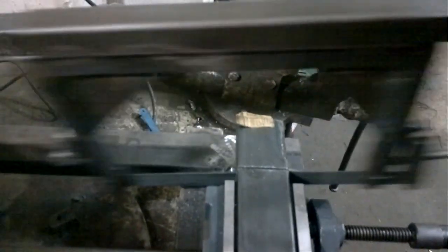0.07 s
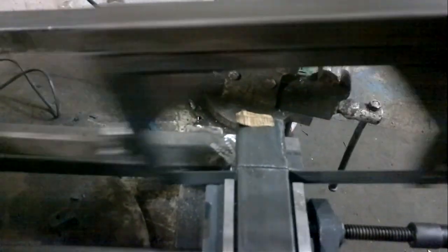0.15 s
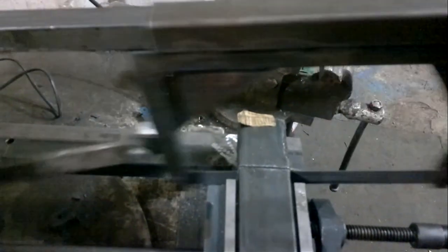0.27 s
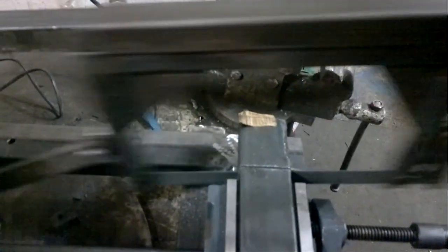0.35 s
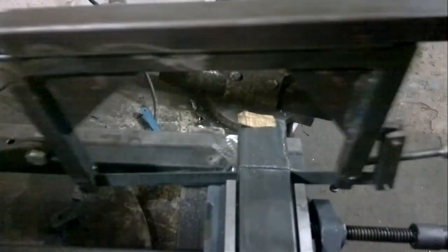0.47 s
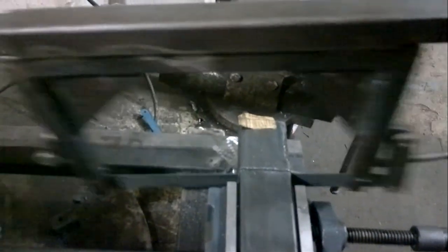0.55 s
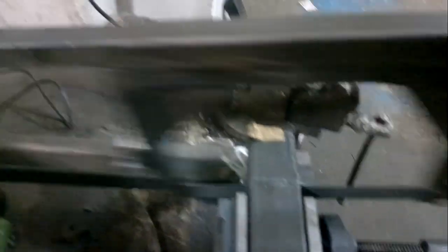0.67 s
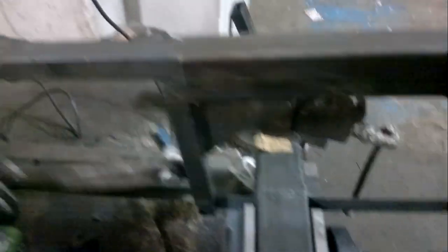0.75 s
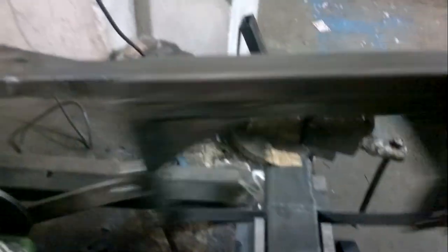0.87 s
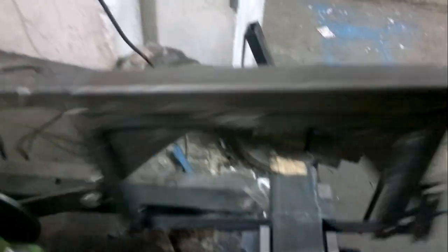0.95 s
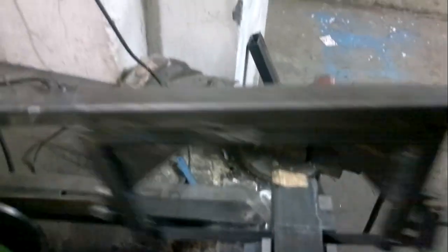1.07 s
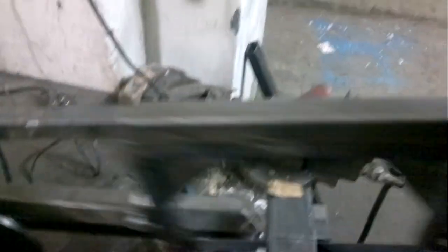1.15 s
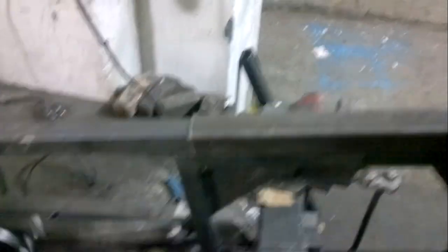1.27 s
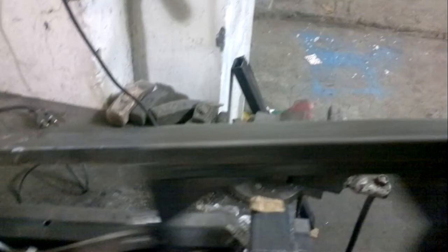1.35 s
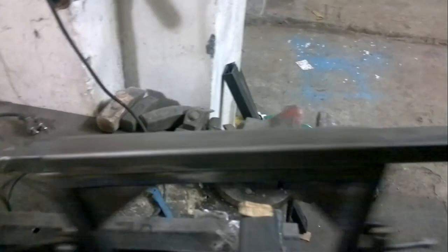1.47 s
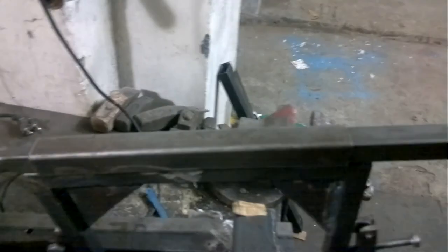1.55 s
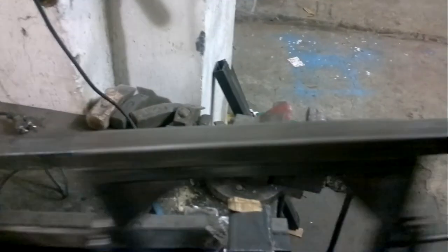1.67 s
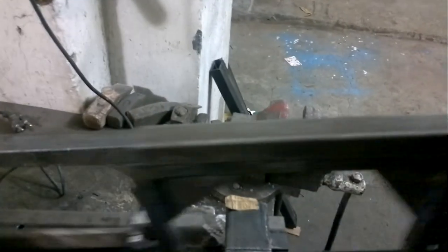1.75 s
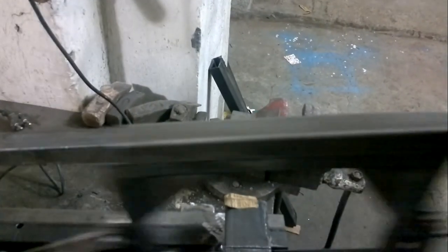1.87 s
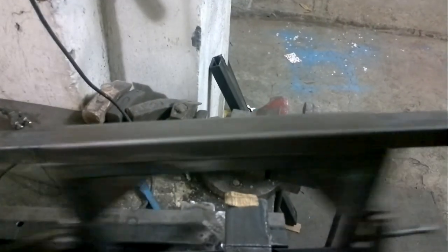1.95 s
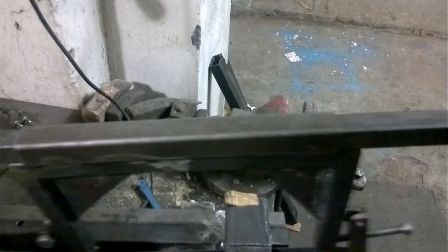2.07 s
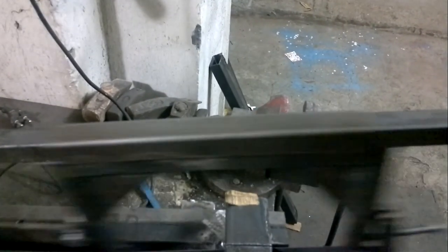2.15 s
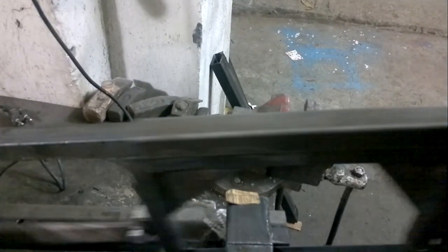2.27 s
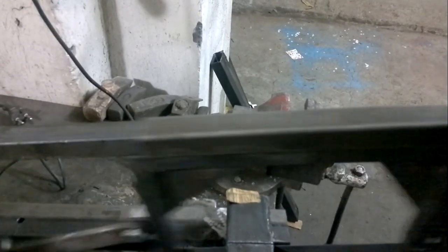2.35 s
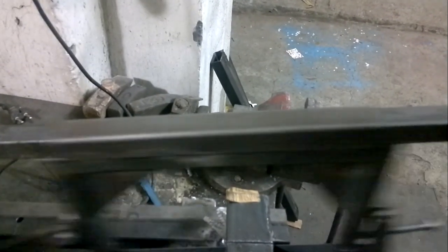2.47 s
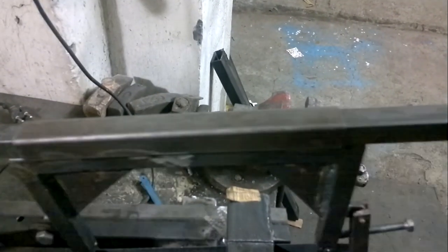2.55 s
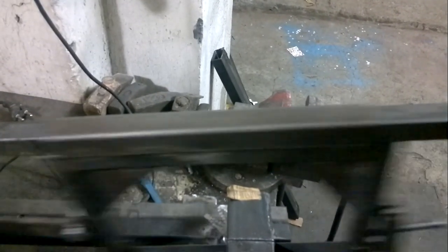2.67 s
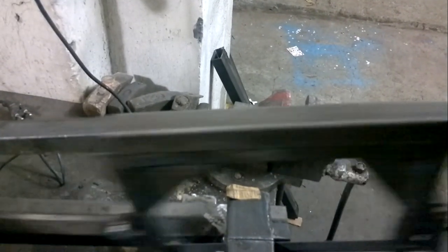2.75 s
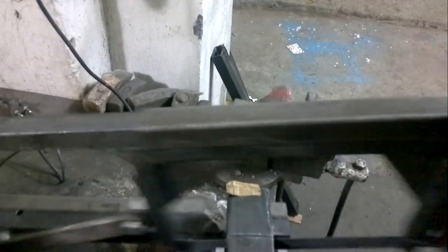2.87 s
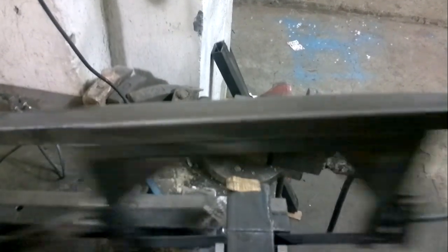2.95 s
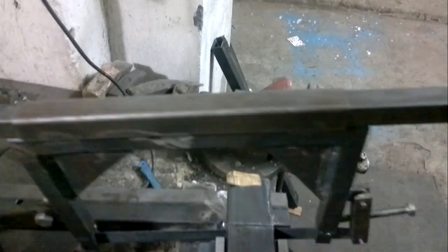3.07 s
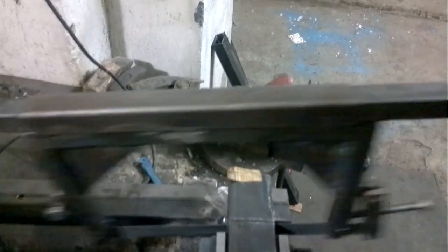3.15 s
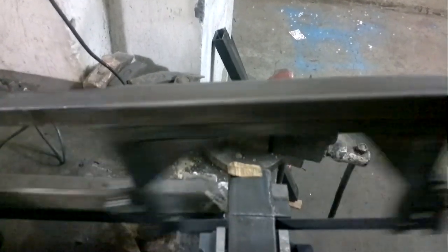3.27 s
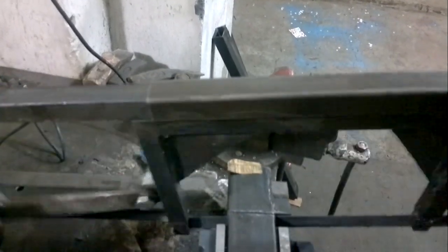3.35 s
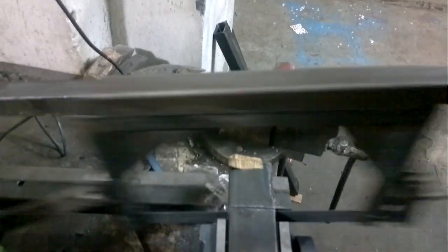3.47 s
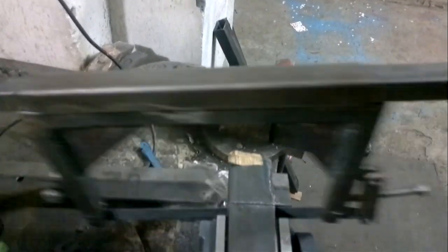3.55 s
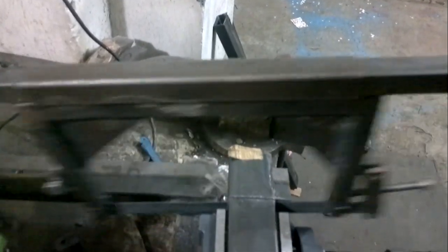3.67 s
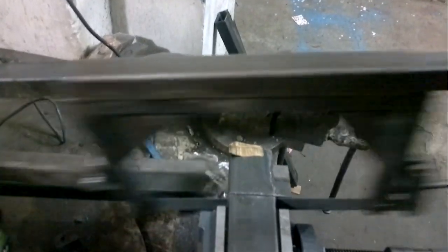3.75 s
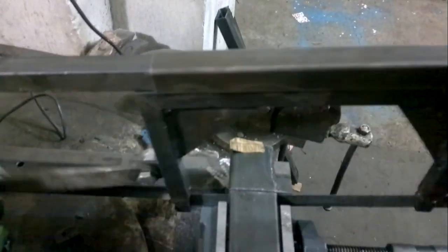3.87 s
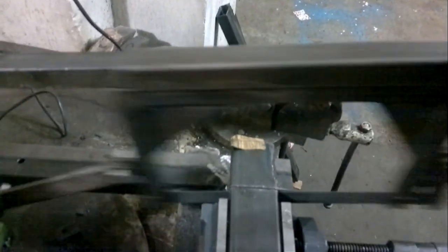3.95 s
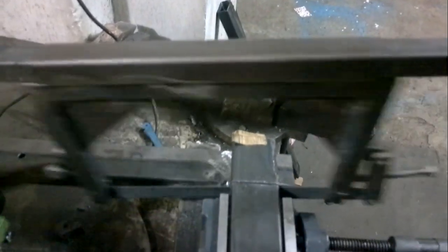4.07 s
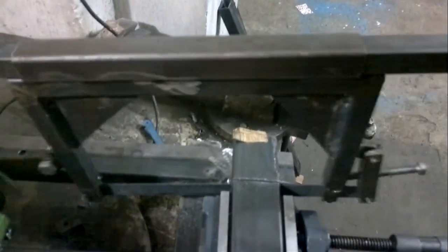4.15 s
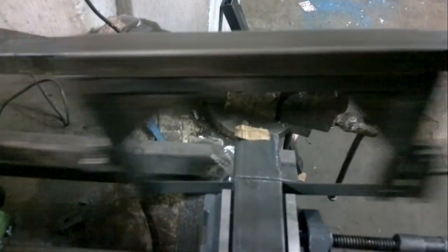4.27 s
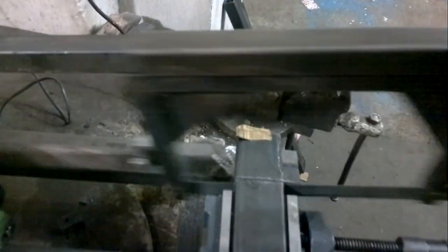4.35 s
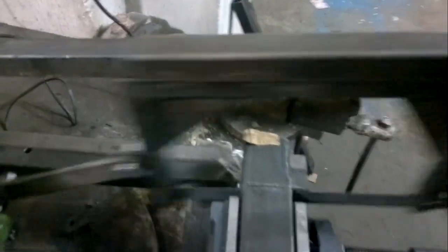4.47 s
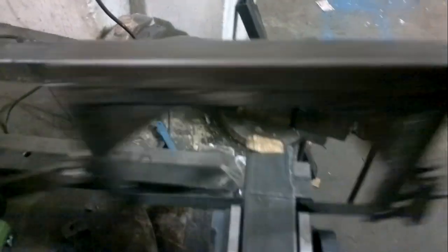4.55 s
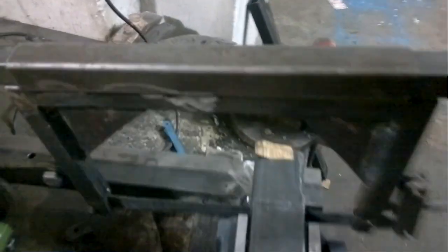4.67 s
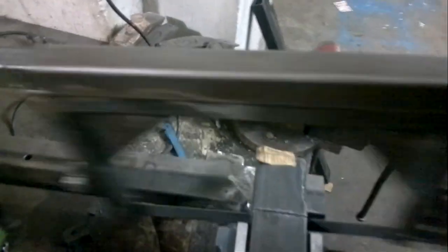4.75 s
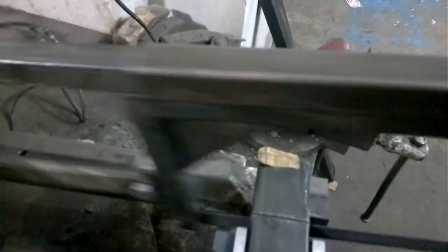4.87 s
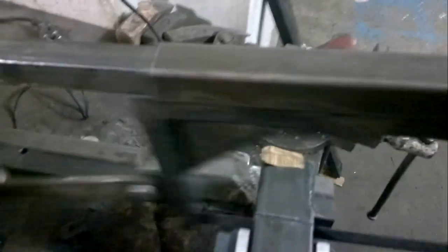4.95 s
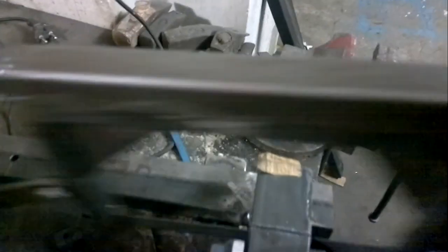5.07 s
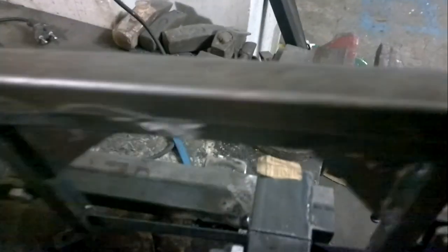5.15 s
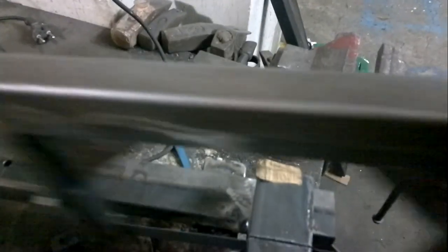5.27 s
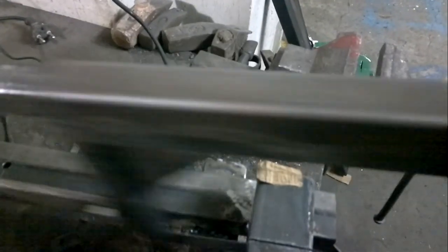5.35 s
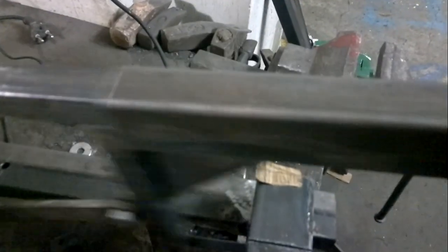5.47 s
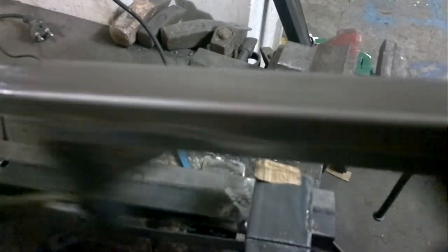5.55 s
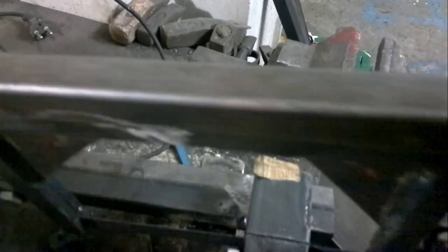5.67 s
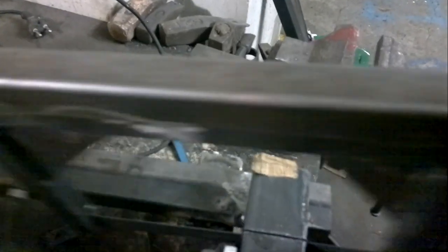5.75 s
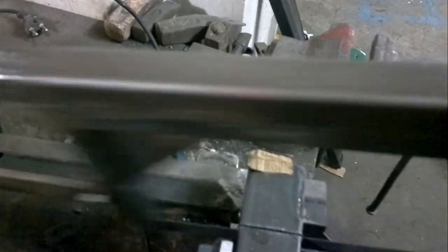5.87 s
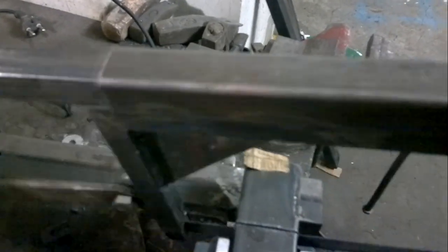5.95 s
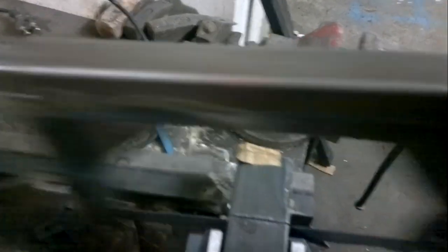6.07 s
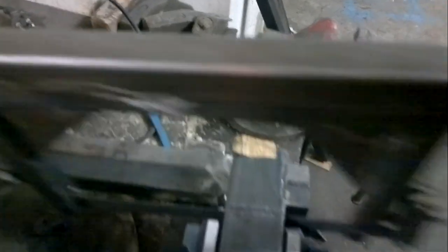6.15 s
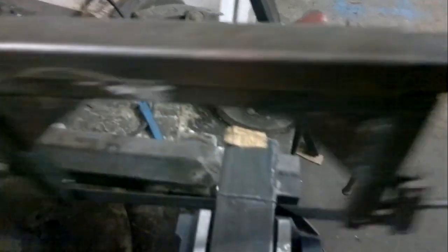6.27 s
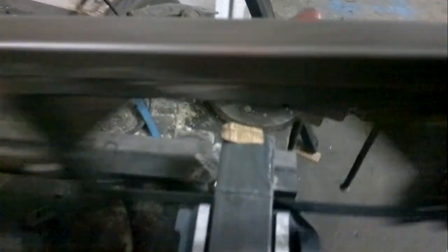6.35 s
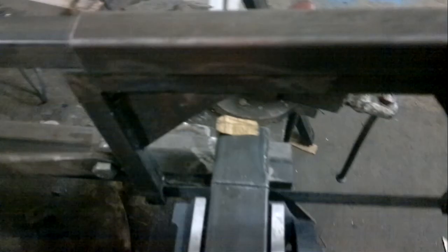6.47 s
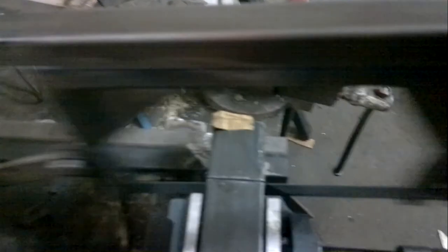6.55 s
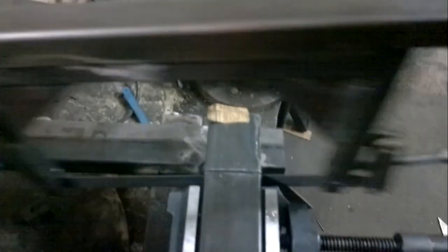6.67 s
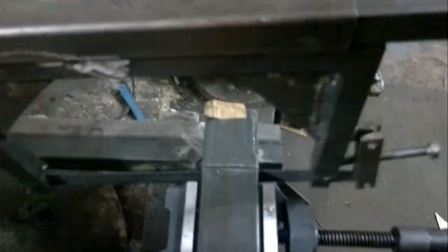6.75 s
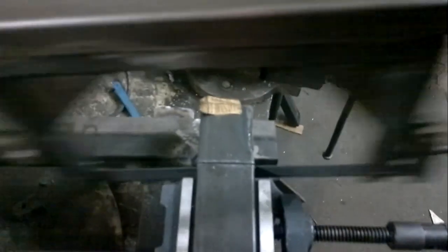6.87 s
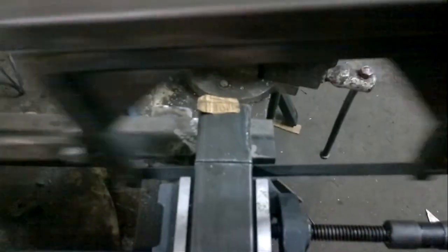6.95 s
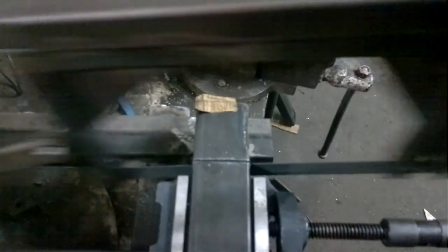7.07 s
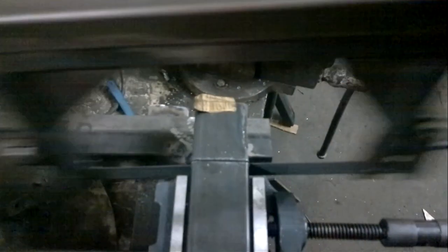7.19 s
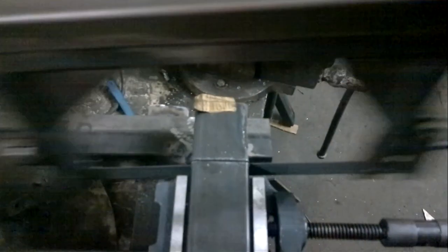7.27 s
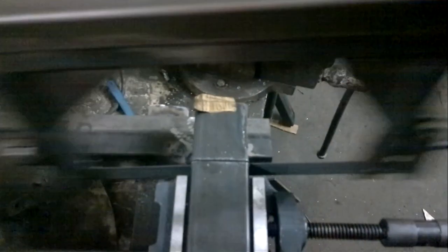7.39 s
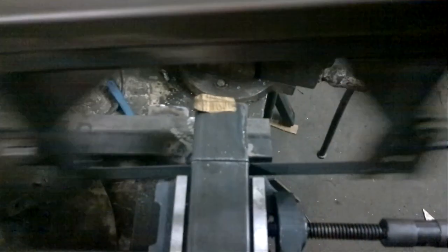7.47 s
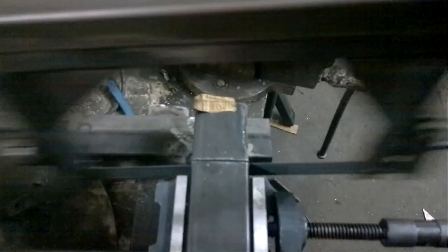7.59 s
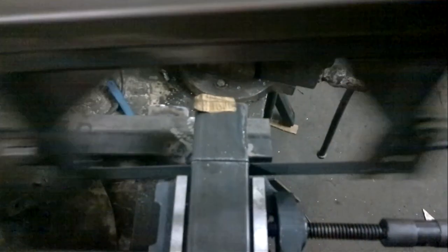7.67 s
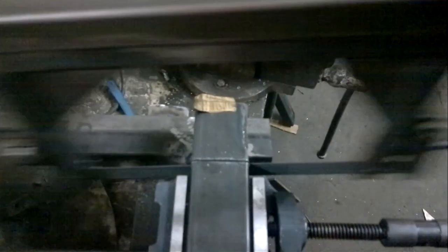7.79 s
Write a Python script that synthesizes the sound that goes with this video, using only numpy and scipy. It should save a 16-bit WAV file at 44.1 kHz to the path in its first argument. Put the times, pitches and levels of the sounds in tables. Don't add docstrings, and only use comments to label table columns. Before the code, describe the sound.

A motorized hacksaw is already cutting steel tube at the start, heard very close in a small-sounding workshop. Low motor hum and belt rumble run throughout, wavering slightly. Direction changes roughly every 0.26 seconds, giving nearly two complete cycles per second. Each cutting stroke begins with a knock and dull thump, bites in a loud chattering rasp, then lets go into a weaker drag; gear buzz rises under load. The return is a lighter, swelling scrape that slows before the next turn. Tube and frame ring metallically. Knocks are especially hard around 0.8, 1.9, 2.4 and 3.4 seconds, with sharp tooth snags near 0.7, 1.8, 4.2 and 6.95. After 4.5 seconds the turns knock less strongly but the sawing continues. The stereo sound leans right, with bright, clipped peaks and short echoes, cutting off abruptly at about 7.3 seconds.

```python
import sys
import numpy as np
from scipy import signal
from scipy.fft import rfft, irfft, next_fast_len
from scipy.io import wavfile
from scipy.ndimage import uniform_filter1d

SR = 44100
rng = np.random.default_rng(int(sys.argv[2]) if len(sys.argv) > 2 else 0)


def voltage_ratio(decibels):
    exponent = np.asarray(decibels, float) / 20
    return 10 ** exponent


def wav_out(sig):
    wavfile.write(sys.argv[1], SR, np.round(np.clip(np.atleast_2d(sig).T, -1, 1) * 32767).astype(np.int16))


N = 344808
STROKE_S, CHATTER_HZ = 0.26, 109.9
LEFT_LAG_SAMPLES = -4
TOP_HZ = 15650


def curve(table, hz):
    freq_hz, level_db = np.transpose(table)
    return voltage_ratio(np.interp(np.log(np.maximum(hz, 1)), np.log(freq_hz), level_db))


def coloured(x, table):
    size = next_fast_len(N + SR // 10)
    hz = np.arange(size // 2 + 1) * SR / size
    return irfft(rfft(x, size) * curve(table, hz), size)[..., :N]


def above(x, hz):
    return coloured(x, [(hz / 1.5, -60), (hz / 3.3, -12), (hz * 1.1, 0)])


def walk_gain(rate_hz, spread_db):
    count = int(N / SR * rate_hz) + 2
    aims = voltage_ratio(spread_db * rng.standard_normal(count))
    return np.interp(np.arange(N) * (rate_hz / SR), np.arange(count), aims)


def carrier(alike):
    both, own = rng.standard_normal(N), rng.standard_normal((2, N))
    alike = np.clip(alike, 0, 1)
    common = np.array([np.roll(both, LEFT_LAG_SAMPLES), both])
    return np.sqrt(alike) * common + np.sqrt(1 - alike) * own


def body(force, rings, broad, alike, wander_db):
    noise = carrier(alike)
    y = coloured(force * noise, broad)
    for k, (freq_hz, width_hz, level_db) in enumerate(rings):
        b, a = signal.iirpeak(freq_hz, freq_hz / width_hz, fs=SR)
        fresh = np.roll(noise, (k + 1) * (SR // 3), axis=1)
        y += signal.lfilter(voltage_ratio(level_db) * b, a, force * walk_gain(18, wander_db) * fresh)
    return y * np.sqrt(np.mean(force ** 2) / np.mean(y ** 2))


def room(x, t60_s, level_db):
    t = np.arange(SR // 2) / SR
    tail = rng.standard_normal((2, len(t))) * np.exp(-np.log(1000) * t / t60_s)
    tail *= voltage_ratio(level_db) / np.sqrt(np.sum(tail ** 2, axis=1, keepdims=True))
    return signal.fftconvolve(x[None], tail, axes=1)[:, :N]


# start_s, level_db
MOTOR_HUM = [(0.0, -55.5), (0.04, -34.5), (0.61, -34.5), (0.75, -32), (0.81, -39.5), (0.99, -33),
             (2.51, -38.5), (2.55, -45.5), (3.08, -27.5), (3.28, -35), (3.99, -32.5), (4.01, -45.5),
             (4.11, -26), (4.22, -34.5), (7.1, -39), (7.28, -34)]
# freq_hz, width_hz, level_db
HUM_RING = [(123.8, 9, 12.5), (138.5, 13, 3.9)]
# freq_hz, width_hz, level_db
STAND_RING = [(61, 19, -4.5), (77.2, 7.1, -1.5), (103.5, 16, -4), (166.5, 14, -6.5), (212.4, 23, -7),
              (324.2, 13, -7.5)]
# freq_hz, level_db
STAND_COLOUR = [(20, -41), (35, -26), (60, -18), (100, -17.5), (150, -26), (250, -12.5), (400, -15),
                (600, -61.5)]
# freq_hz, level_db
FLAT_FLOOR = [(300, -45), (1500, -45)]


def motor(buzz_db):
    settle_s, rumble_over_hum_db = 1, -1.5
    hum_db = np.interp(np.arange(N) / SR, *np.transpose(MOTOR_HUM))
    rumble_db = uniform_filter1d(hum_db, size=int(settle_s * SR)) + rumble_over_hum_db
    hum = body(walk_gain(9, 3.6), HUM_RING, FLAT_FLOOR, 0.99, 0.65)
    stand = body(walk_gain(28, 1.2), STAND_RING, STAND_COLOUR, 0.85, 3.8)
    buzz = above(stand, 210)
    rumble = walk_gain(6, 2.5) * (stand - buzz)
    load = uniform_filter1d(voltage_ratio(buzz_db + 4.0), size=SR // 50)
    return voltage_ratio(hum_db + 1.0) * hum + voltage_ratio(rumble_db) * rumble + load * buzz


def thumps(level_db, freq_hz=55, late_s=0.037, long_s=0.018):
    t, x = np.arange(SR // 6) / SR, np.zeros(N)
    swell = np.exp(-((t - late_s) / long_s) ** 2 / 2)
    for start_s, _ in TURNS[1::2]:
        x[int(start_s * SR):][:len(t)] += swell * np.sin(2 * np.pi * freq_hz * t)
    return voltage_ratio(level_db) * x


# centre_s, level_db, length_s
FRAME_SWELLS = [(0.271, -42, 0.09), (0.343, -36.5, 0.033), (0.478, -37, 0.022), (0.773, -30, 0.054),
                (0.925, -29, 0.024), (1.302, -32.5, 0.056), (1.378, -39.5, 0.024), (1.822, -36, 0.034),
                (2.163, -34.5, 0.032), (2.481, -42.5, 0.014), (2.872, -29, 0.017), (3.196, -36, 0.054),
                (3.376, -39.5, 0.045), (3.453, -34, 0.041), (3.535, -37, 0.056), (3.626, -36.5, 0.058),
                (3.725, -30, 0.057), (3.98, -28.3, 0.046), (4.065, -40, 0.036), (4.245, -30, 0.037),
                (4.39, -39, 0.05), (4.528, -35, 0.13), (4.94, -39.5, 0.073), (5.448, -38.5, 0.029),
                (5.943, -40.5, 0.052), (6.117, -50, 0.15), (6.429, -34, 0.035), (6.589, -37.5, 0.054),
                (6.653, -38.5, 0.031), (7.004, -37, 0.14)]


def shake(rasp_db):
    floor_db, follow_share = -33.5, 0.31
    t = np.arange(N) / SR
    x = voltage_ratio(floor_db + follow_share * rasp_db) * walk_gain(25, 1.4)
    for centre_s, level_db, length_s in FRAME_SWELLS:
        x = x + voltage_ratio(level_db) * np.exp(-(2 * (t - centre_s) / length_s) ** 2)
    return x


# freq_hz, width_hz, level_db
FRAME_RING = [(772.3, 29.6, 9.5), (820, 320, -10)]


def saw_frame(tooth_clicks, rasp_db):
    return voltage_ratio(-0.5) * body(tooth_clicks * shake(rasp_db), FRAME_RING, FLAT_FLOOR, 0.65, 1.6)


# start_s, knock_peak_db
TURNS = [(0.0513, -11), (0.311, -1.5), (0.5715, -8.5), (0.8327, 3), (1.0924, -23), (1.3523, -1.5),
         (1.613, -18.5), (1.8738, 2.5), (2.1323, -9.5), (2.3934, 1.5), (2.652, -13), (2.9135, -1),
         (3.1723, -8), (3.433, 1.5), (3.692, -7), (3.9527, 0), (4.2128, -6), (4.473, -8), (4.732, -13),
         (4.993, -7.5), (5.251, -9.5), (5.5136, -5), (5.7732, -10), (6.0337, -3.5), (6.2924, -11.5),
         (6.5525, -9), (6.813, -9.5), (7.0733, -4.5)]
# start_s, peak_db
SNAGS = [
    (0.2094, -31),
    (0.7064, -11.5),
    (1.1747, -16.5),
    (1.783, -2.5),
    (2.2675, -17),
    (2.6783, -29.5),
    (4.2388, -11),
    (6.951, -3.5),
]
# freq_hz, width_hz, level_db
KNOCK_RING = [(2150, 90, 6), (3040, 87, 9), (3780, 370, 7), (6020, 77, 4), (6510, 150, -12.5)]


def knocks(turn_db=-8.5, snag_db=-5, burst_s=0.003, rebound_db=2.5, fade_db=1.5):
    x, t = np.zeros(N), np.arange(1024) / SR
    hits = [(s, db + turn_db) for s, db in TURNS]
    hits += [(s, db + snag_db) for s, db in SNAGS]
    for k in range(3):
        late_s, change_db = (k + 1) / CHATTER_HZ, turn_db + rebound_db - k * fade_db
        hits += [(s + late_s, db + change_db) for s, db in TURNS[1::2]]
    for start_s, level_db in hits:
        x[int(start_s * SR):][:1024] += voltage_ratio(level_db) * np.exp(-t / burst_s)
    ring = body(x, KNOCK_RING, RASP_COLOUR, 0.35, 2.5)
    return ring - 0.8 * above(ring, 8000)


# bite_db, bite_length_s, drag_db, tube_over_rasp_db, gear_buzz_db
CUTS = [(-14.5, 0.083, -24, -2.5, -31), (-14.5, 0.057, -21, -2.5, -29.5), (-15, 0.084, -29.5, -5.4, -40),
        (-17, 0.089, -26.5, -0.5, -32.5), (-17, 0.098, -28, -3.5, -34.5), (-14, 0.032, -22.5, -5, -36),
        (-15.5, 0.088, -23.5, -3, -28.5), (-18.5, 0.091, -22.5, -4, -29.5), (-14, 0.088, -25.5, -6, -34),
        (-14, 0.092, -26.9, -4, -34), (-14, 0.094, -28, -4.5, -32), (-13.5, 0.095, -27, -3, -33.5),
        (-14.5, 0.096, -26.5, -2.5, -32), (-14, 0.097, -26.5, -3.5, -33)]
# loudest_db, loudest_after_s, set_off_db, tube_over_rasp_db
BACKS = [(-21, 0.16, -39.5, -3.5), (-21, 0.16, -35.5, -4.5), (-20.5, 0.162, -35.5, -6),
         (-24, 0.17, -42.5, -4), (-21, 0.17, -35, -5), (-21, 0.17, -36.5, -6.5), (-21, 0.17, -33.5, -6),
         (-19.5, 0.16, -35.5, -8.5), (-18.3, 0.16, -32.5, -5), (-19, 0.16, -36.5, -6),
         (-20, 0.17, -37.5, -9.5), (-20, 0.16, -38, -6.5), (-20.5, 0.17, -37, -6), (-22, 0.16, -38, -1.5)]
# after_turn_s, sizzle_over_rasp_db, tube_change_db
CUT_COLOUR = [
    (0, -11, -2.5),
    (.03, -10, 0),
    (.08, -11, 0.5),
    (.18, -11.5, 5),
    (.26, -17, -3.5),
]
# after_turn_s, sizzle_over_rasp_db, tube_change_db
BACK_COLOUR = [
    (0, -4, 3),
    (.03, -12, 3.5),
    (.1, -9.5, 2),
    (.17, -12.5, -0.5),
    (.26, -13.5, 6.5),
]


def strokes():
    bite_in_s, bite_in_db, bite_sag_db = 0.009, -3, -2.5
    let_go_s, drag_tautness, cut_fade_db = 0.025, 0.6, -16.5
    slow_s, slow_db, back_fade_db = 0.041, -4.5, -22.5
    lead_in_db, buzz_idle_db, load_eases_db = -3, -40, -9
    t = np.arange(N) / SR
    turn_s = np.r_[TURNS[0][0] - STROKE_S, np.array(TURNS)[:, 0]]
    which = np.searchsorted(turn_s, t, "right") - 1
    since_s = t - turn_s[which]
    rasp_db, sizzle_db, tube_db, buzz_db, taut = controls = np.zeros((5, N))

    first = np.add(CUTS[0], [lead_in_db, 0, lead_in_db, 0, lead_in_db])
    for k, (bite_db, hold_s, drag_db, ring_db, gear_db) in enumerate([first, *CUTS]):
        on = which == 2 * k
        rasp_db[on] = np.interp(since_s[on], [0, bite_in_s, hold_s, hold_s + let_go_s, STROKE_S],
                                [bite_db + bite_in_db, bite_db, bite_db + bite_sag_db,
                                 drag_db, drag_db + cut_fade_db])
        taut[on] = np.interp(since_s[on], [hold_s, hold_s + let_go_s], [1, drag_tautness])
        tube_db[on] = ring_db
        buzz_db[on] = gear_db + load_eases_db * (since_s[on] / STROKE_S) ** 2
    for k, (top_db, peak_s, start_db, ring_db) in enumerate(BACKS):
        on = which == 2 * k + 1
        rasp_db[on] = np.interp(since_s[on], [0, peak_s, peak_s + slow_s, STROKE_S],
                                [start_db, top_db, top_db + slow_db, top_db + back_fade_db])
        tube_db[on], buzz_db[on] = ring_db, buzz_idle_db

    cutting = which % 2 == 0
    for on, colour in ((cutting, CUT_COLOUR), (~cutting, BACK_COLOUR)):
        after_s, sizzle, tube_change = np.transpose(colour)
        sizzle_db[on] += np.interp(since_s[on], after_s, sizzle)
        tube_db[on] += np.interp(since_s[on], after_s, tube_change)
    return cutting, since_s, controls


def teeth(cutting, since_s, spread_db=2.5, bounce_db=13, bounce_s=0.05, flutter_db=2.0,
          back_flutter=0.95, slow_db=2.2):
    saw = (since_s * CHATTER_HZ) % 1
    bounce = -bounce_db * saw * np.exp(-since_s / bounce_s) * cutting
    flutter = walk_gain(150, flutter_db) ** np.where(cutting, 1, back_flutter)
    click_db = spread_db * np.minimum(rng.exponential(size=N), 4)
    x = voltage_ratio(click_db + bounce) * flutter * walk_gain(35, slow_db)
    return x / np.sqrt(uniform_filter1d(x ** 2, size=SR // 16))


# freq_hz, width_hz, level_db
CUT_RING = [(1007, 69, -14), (1488, 23, -12.5), (2476, 40, -14.5), (3017, 51, 2), (3820, 130, -3),
            (4140, 80, -16.5), (5015, 90, -11.5), (6100, 300, -28), (10320, 500, -28.5)]
# freq_hz, width_hz, level_db
BACK_RING = [(625, 36, -27), (1941, 110, -4.5), (2673, 210, -6.5), (2970, 55, -12), (3310, 93, -2.5),
             (3880, 520, -5), (5120, 29, -17), (6600, 230, -21.5)]
# freq_hz, width_hz, level_db
TUBE_RING = [(2125, 48, 0), (2033, 130, -8.5)]
# freq_hz, level_db
RASP_COLOUR = [(200, -33), (350, -19.5), (1000, -18), (1600, -18), (2100, -10), (2600, -7.5), (3700, -9),
               (4400, -14.5), (5200, -22.5), (6200, -17.5), (8000, -29.5), (10500, -37), (13500, -46),
               (15600, -56.5)]


def blade(tooth_clicks, taut, rasp_db, sizzle_db, tube_db):
    force = tooth_clicks * voltage_ratio(rasp_db)
    slack = np.sqrt(np.clip(1 - taut ** 2, 0, 1))
    tone = body(force * taut, CUT_RING, RASP_COLOUR, 0.3, 3.6)
    tone += voltage_ratio(1.0) * body(force * slack, BACK_RING, RASP_COLOUR, 0.24, 2.02)
    tube = body(force * voltage_ratio(tube_db - 2.0), TUBE_RING, FLAT_FLOOR, 0.35, 0.88)
    sizzle = (voltage_ratio(sizzle_db + 12.5) - 1) * above(tone, 5700)
    return tube + tone + sizzle


# freq_hz, level_db
BITE_LEFT = [(3000, -21.5), (4200, -14), (5000, 3), (5800, -13), (12000, -9)]
# start_s, left_minus_right_db
PAN = [(0.0, -8.5), (0.77, -8), (1.74, -10.5), (3.81, -9.5), (5.07, -8.5), (5.47, -9.5), (6.53, -9),
       (7.28, -7.5)]


def scene():
    cutting, since_s, (rasp_db, sizzle_db, tube_db, buzz_db, taut) = strokes()
    tooth_clicks = teeth(cutting, since_s)
    frame = saw_frame(tooth_clicks, rasp_db)
    steel = blade(tooth_clicks, taut, rasp_db, sizzle_db, tube_db) + knocks()
    steel[0] += coloured(steel[0] * taut ** 4, BITE_LEFT)
    lows = coloured(steel, [(1500, -1.5), (2300, -15), (3500, -40.5)])
    steel[0] += 0.54 * (np.roll(lows[1], LEFT_LAG_SAMPLES) - lows[0])
    steel += room(steel[1], t60_s=0.25, level_db=-11.0)
    start_s, pan_db = np.transpose(PAN)
    steel[0] *= voltage_ratio(np.interp(np.arange(N) / SR, start_s, pan_db - np.mean(pan_db)))
    return voltage_ratio(3.5) * (voltage_ratio(0.83) * steel + frame + motor(buzz_db) + thumps(level_db=-30.0))


def starve(x, from_hz=7000, mask_db=-29, floor_db=-86, thin_hz=8500, thin=1.2):
    hz, _, z = signal.stft(x, SR, nperseg=1024)
    size = np.abs(z)
    loud = np.sqrt(np.mean(size ** 2, axis=1, keepdims=True))
    bands = uniform_filter1d(size, size=4, axis=1)
    kept = (bands > voltage_ratio(mask_db) * loud + voltage_ratio(floor_db)) | (hz < from_hz)[:, None]
    lasting = uniform_filter1d(size, size=3, axis=2)
    share = np.interp(hz, [thin_hz, TOP_HZ], [0.6, thin])[:, None] * (hz > thin_hz)[:, None]
    strong = lasting > share * uniform_filter1d(lasting, size=24, axis=1)
    steady = loud < 1.6 * np.roll(loud, 2, axis=2)
    kept &= strong | ~steady
    return signal.istft(z * kept * (hz < TOP_HZ)[:, None], SR, nperseg=1024)[1][:, :N]


def roll_off(x):
    return signal.sosfilt(signal.butter(12, 15610, fs=SR, output="sos"), x)


# freq_hz, left_minus_right_db
PORTS = [(60, -10.5), (110, -9.5), (200, -12), (380, -8), (700, -7.5), (1550, -1), (2380, -13.5),
         (4400, -7.5), (8120, -7.5), (15000, -1.5)]
# freq_hz, level_db
TREBLE_SLOPE = [(9000, -0.38), (13500, -4), (14500, -2.5), (15600, -11)]


def record(dry):
    stop_s = 7.289
    ports = np.array([coloured(dry[0], PORTS), dry[1]])
    clipped = np.clip(0.94 * ports, -1, 1)
    mix = starve(coloured(clipped, TREBLE_SLOPE))
    return roll_off(mix * (np.arange(N) < stop_s * SR))


dry = scene()
out = record(dry)
wav_out(out)
```